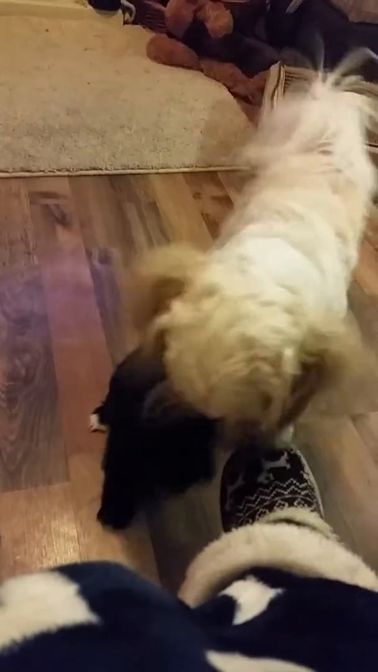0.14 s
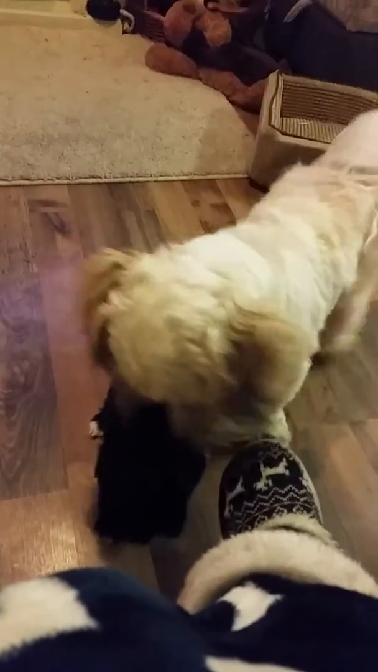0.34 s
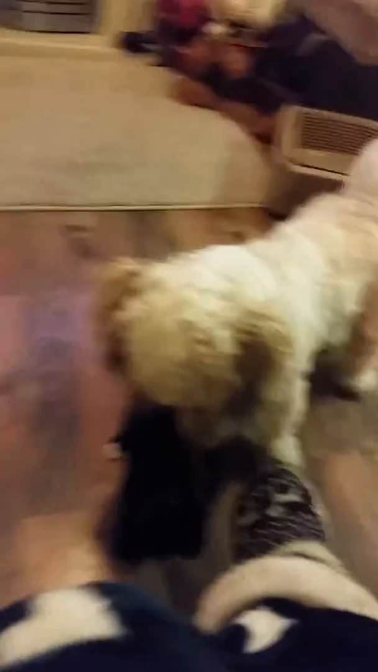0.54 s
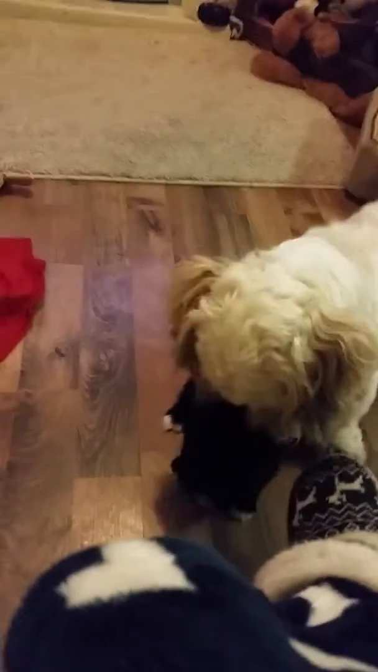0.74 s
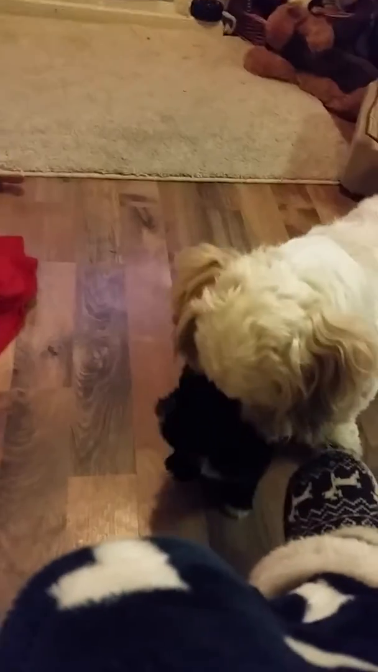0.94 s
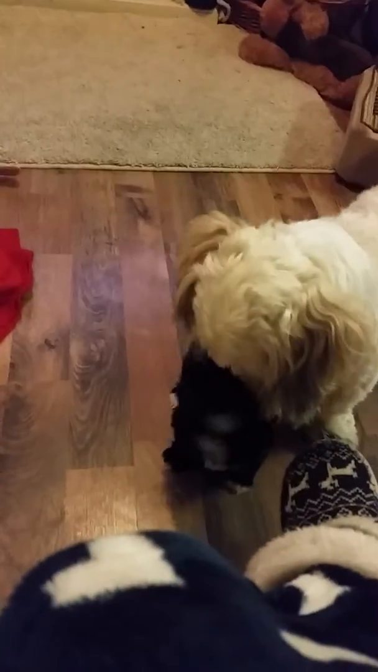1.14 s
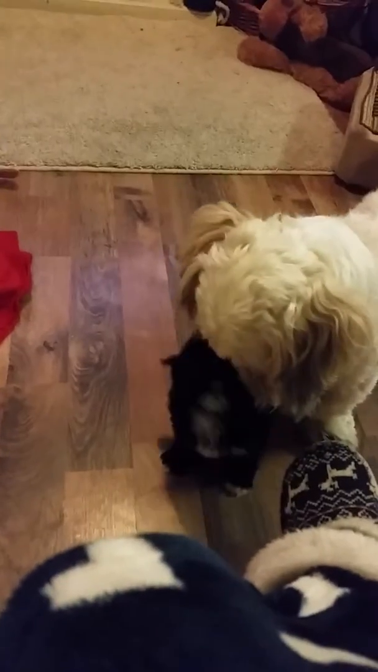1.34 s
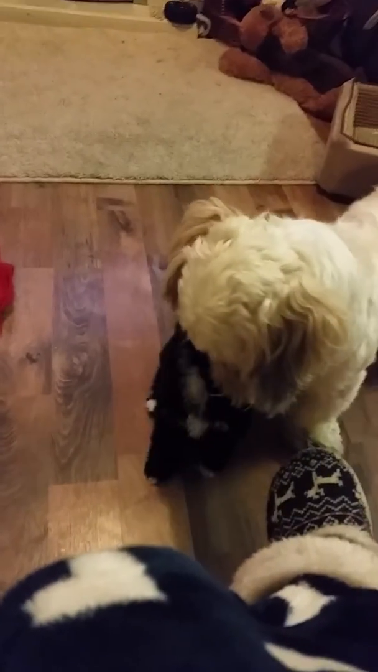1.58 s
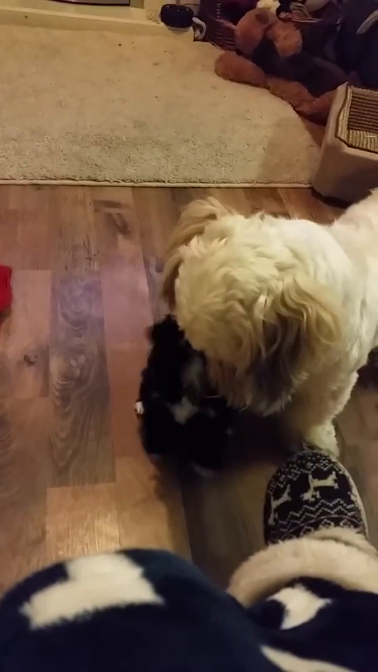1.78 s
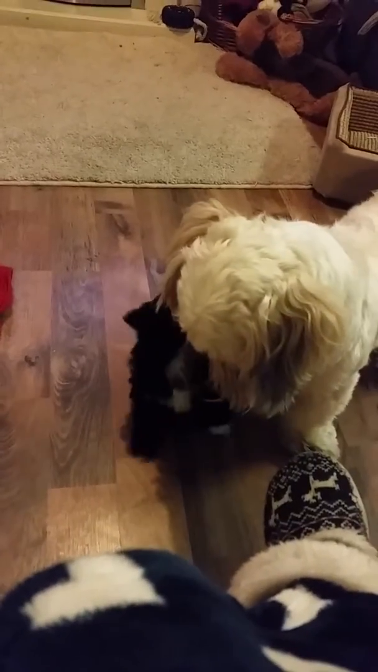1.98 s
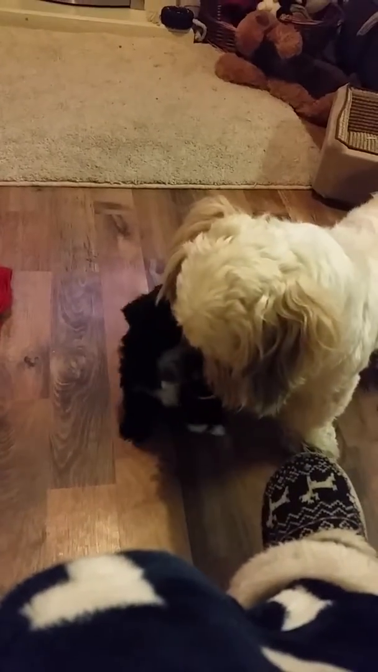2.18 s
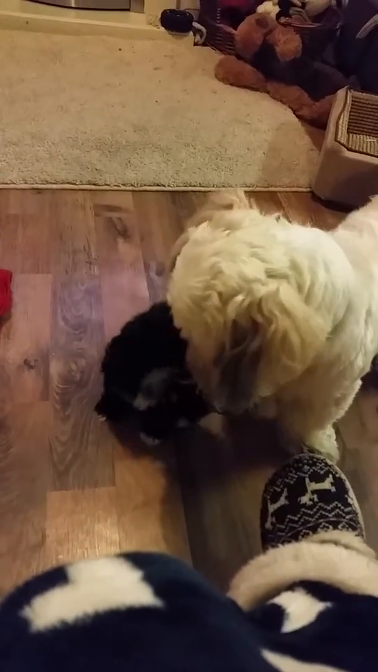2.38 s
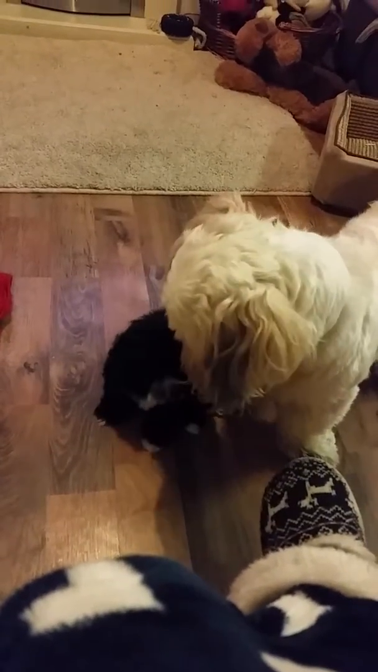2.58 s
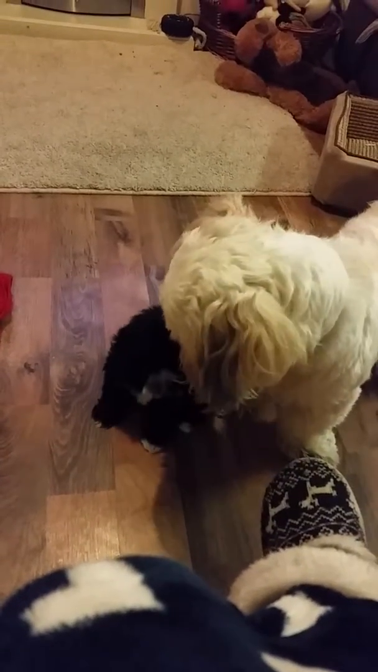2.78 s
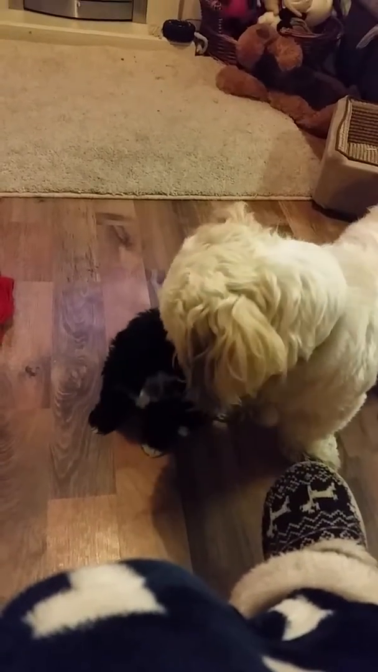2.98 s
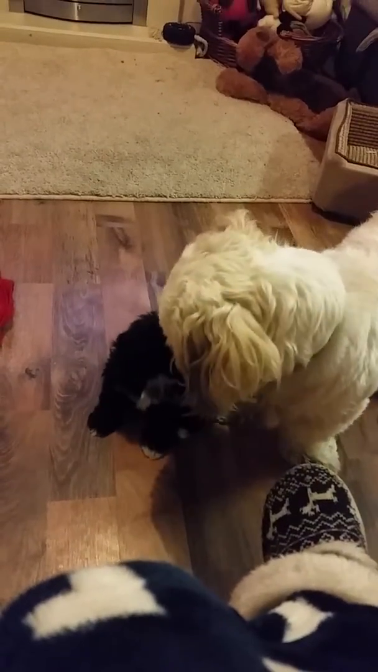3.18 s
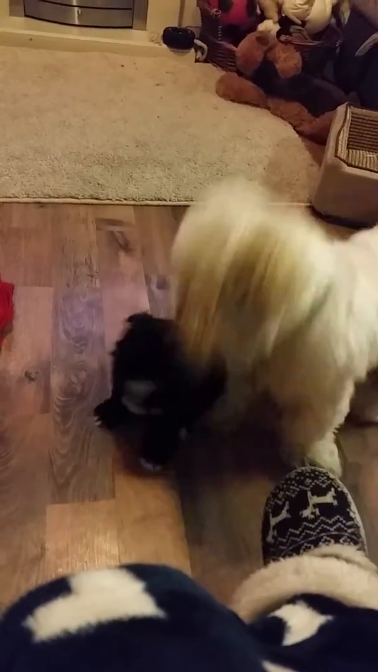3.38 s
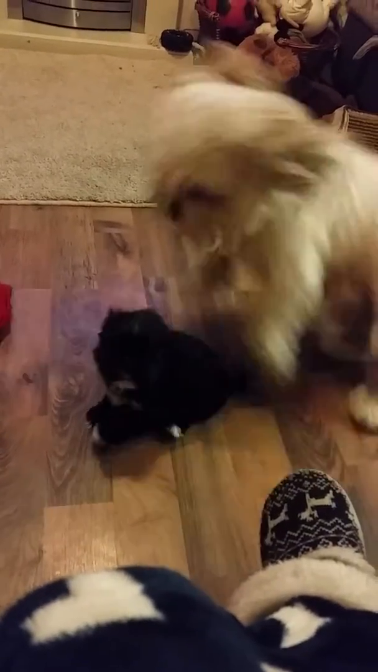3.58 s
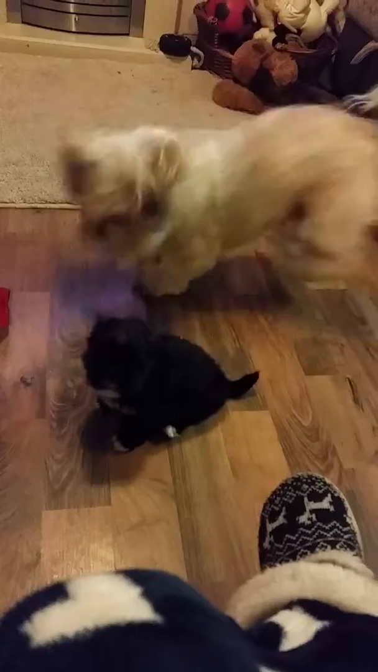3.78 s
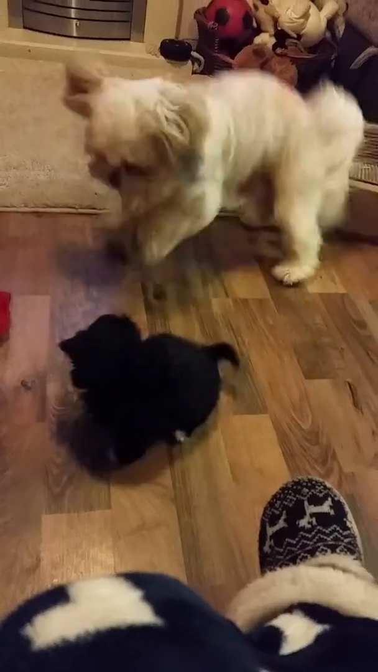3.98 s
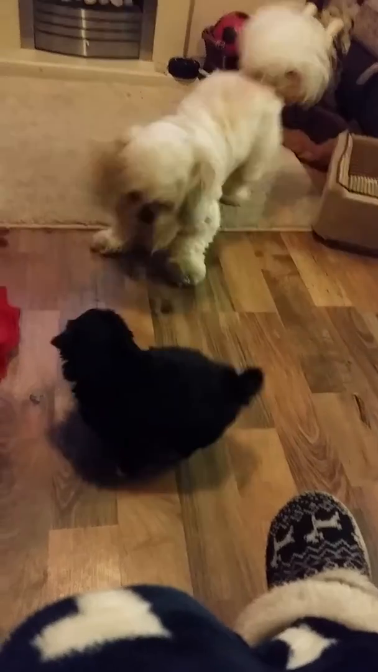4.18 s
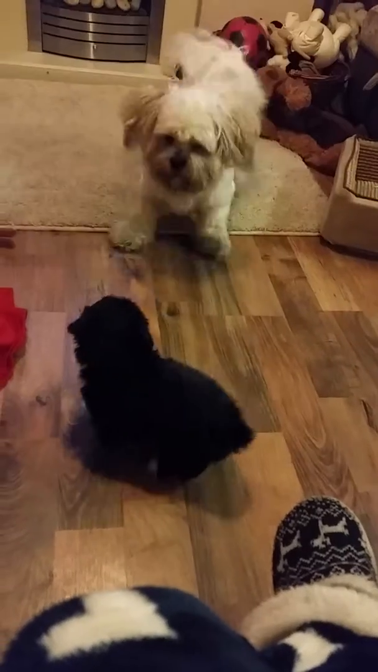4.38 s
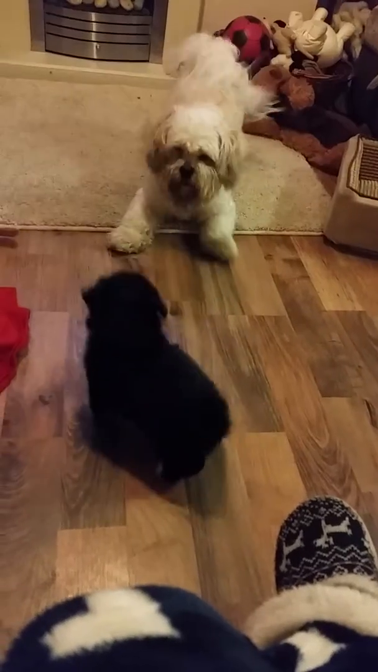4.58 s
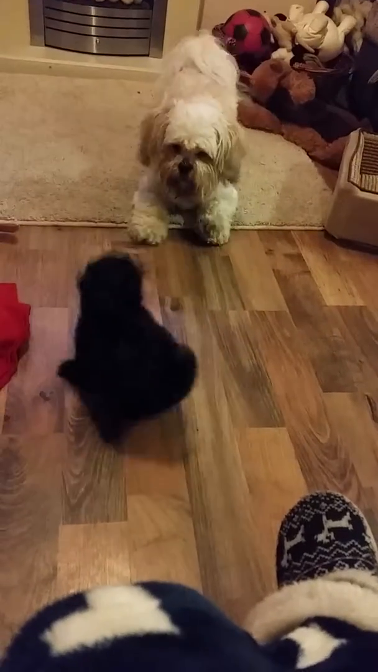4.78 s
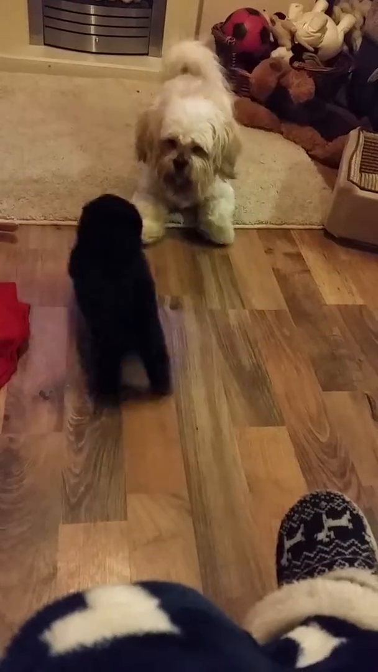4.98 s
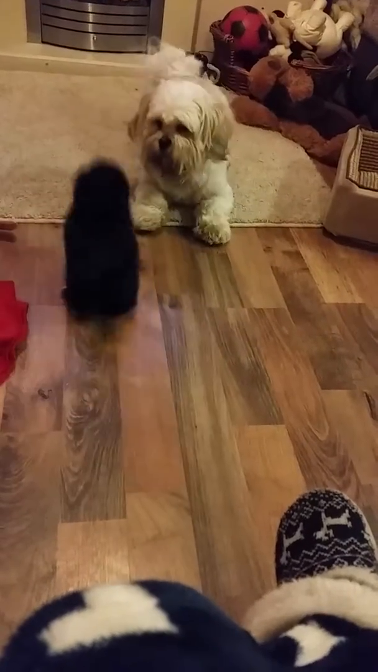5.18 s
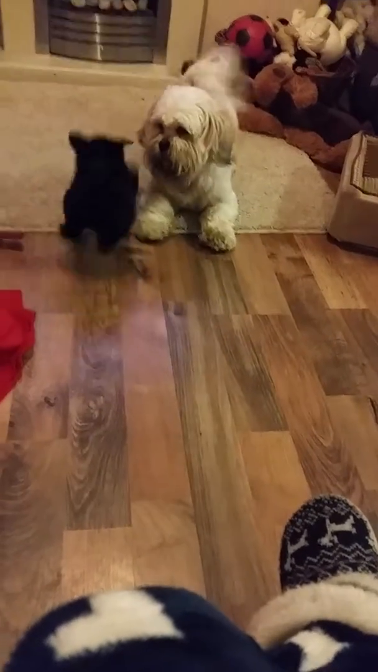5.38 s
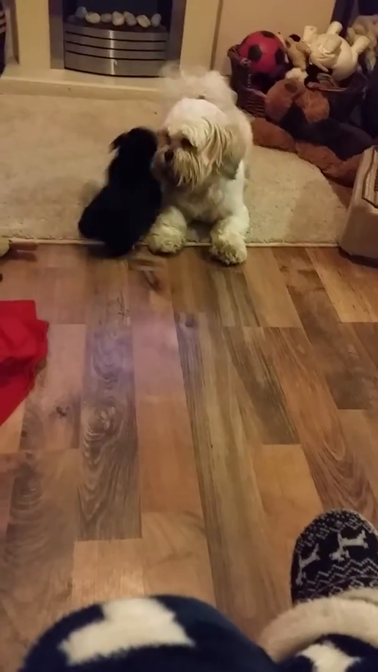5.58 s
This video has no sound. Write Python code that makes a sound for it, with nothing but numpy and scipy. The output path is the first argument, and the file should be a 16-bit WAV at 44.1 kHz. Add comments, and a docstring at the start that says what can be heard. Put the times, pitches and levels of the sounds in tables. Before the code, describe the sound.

In a living room, a small dog and a puppy play on laminate. Short scuffs and claw ticks open, then quiet hum with dull bumps on the handheld phone. Near four seconds comes a sharp scrabble of claws and paw slaps with short echoes, fading to faint pats and a final handling bump.

```python
"""A low appliance hum, house rumble and faint microphone hiss lie under a small dog and a puppy at play.
Paws scuff on laminate from the start as shaped friction noise, and pads land as soft slaps and thuds.
Claws tick in quick clusters: grating clicks excite ringing nails and knock the boards.
The living room answers every paw contact with echoes, and each clawed paw stirs the floor rumble.
Between the flurries of paws and again near the end, fingers bump the hand-held phone beside its right
port, as dull swings of pressure."""
import sys
import numpy as np
from scipy import signal
from scipy.fft import rfft, irfft
from scipy.io import wavfile
from scipy.ndimage import uniform_filter1d

SR = 44100
rng = np.random.default_rng(int(sys.argv[2]) if len(sys.argv) > 2 else 0)


def wav_record(signal):
    """Record a signal, one row per channel, as 16-bit PCM in the file named by sys.argv[1]."""
    frames = np.transpose(np.atleast_2d(signal))
    bounded = np.clip(frames, -1, 1)
    # unit amplitude maps onto the largest positive 16-bit level
    quanta = np.round(bounded * 32767).astype(np.int16)
    wavfile.write(sys.argv[1], SR, quanta)


N = 248724

# Every *_SPECTRUM table below has the columns freq_hz [Hz], level_db [dB, relative density].
# Every pan_db is left minus right [dB].

# appliance hum: freq_hz [Hz], level_db [dB rms], waver [share of the steady tone]
HUM_TONES = [(53.9, -54.5, .07), (102.3, -67, .45), (215.3, -72, .6)]
# low noise of house and floor: freq_hz [Hz], level_db [dB]
RUMBLE_SPECTRUM = [(20, -28), (38, -16), (55, -6), (78, -6.5), (105, 0.5), (160, -6.5), (215, -6),
                   (390, -14), (520, -23), (600, -17.5), (760, -30.5), (1100, -37), (3000, -58.5),
                   (9000, -93.5)]
# faint microphone hiss: freq_hz [Hz], level_db [dB]
AIR_SPECTRUM = [(1500, -3.5), (2150, 7), (3050, -2.5), (3650, 3), (4400, -3), (5900, -8.5), (7000, -3),
                (9800, -11), (11400, -6.5), (12300, 1.5), (13200, 0), (14400, -2.5)]
# rumble power each clawed paw adds: level for a 0 dB tick [dB], slope [dB per dB of tick],
# decay constant of the amplitude [s]
SHAKE_DB, SHAKE_SLOPE, SHAKE_FALL_S = -52.5, .3, .35

# scuffs and slides of paws and fur; the row at .59 is lingering room reverberation after the claw hits:
# start_s [s], rise_s [s], fall_s [s, decay constant],
# hiss_db [dB, before flicker], rub_db [dB relative to hiss], pan_db [dB]
FRICTION_SWELLS = [(0.0, 0.001, 0.098, -52, -1.5, -2), (.088, 0.0071, 0.016, -36.5, -8, -3),
                   (0.205, 0.015, 0.029, -47.5, -7.5, 0.5), (0.338, 0.0024, 0.026, -49, -2.5, 9),
                   (0.344, 0.021, 0.028, -38.5, -28, -5.5), (0.475, 0.0046, 0.02, -49.5, -6, 2.5),
                   (.59, 0.056, 0.18, -74.5, 0.5, -1.5), (1.98, 0.022, 0.12, -82, -6.5, -4),
                   (3.435, 0.0056, 0.081, -53.5, -5.5, -2.5), (3.51, 0.11, 0.072, -53, 0.5, -2),
                   (3.61, 0.12, 0.017, -45, -10, -1), (3.851, 0.01, 0.0078, -31.5, -11, -8),
                   (4.448, 0.0013, 0.11, -48, -6, -1), (4.66, .03, 0.14, -85.5, 13, -4),
                   (4.864, 0.013, 0.029, -62, -3, -4), (4.964, 0.032, 0.12, -76, 7.5, -1.5),
                   (5.127, .015, 0.048, -73, -1, -1.5), (5.24, 0.042, 0.068, -81, 4, -3),
                   (5.358, .012, 0.056, -78.5, -1.5, -1)]
# fine hiss over the wood grain: freq_hz [Hz], level_db [dB]
HISS_SPECTRUM = [(1200, -18), (2200, -9), (4200, -6), (6000, -4), (7100, 2), (8000, -2.5), (8900, -0.5),
                 (10500, -12.5), (12300, -6), (14500, -15.5)]
# boards rubbing along: freq_hz [Hz], level_db [dB]
RUB_SPECTRUM = [(150, -11.5), (350, -7.5), (700, 1), (1100, -5.5), (2000, -8), (3500, -20)]

# paw pads landing: start_s [s], level_db [dB, before the slap and thud trims],
# thud_db [dB relative to level_db, before the thud trim], pan_db [dB], contact_s [s]
PAD_LANDINGS = [(0.0568, -50.5, 6, 0, 0.002), (0.0734, -56.5, 5.5, -1, 0.0041),
                (2.3537, -42.5, -13.5, -1, 0.00046), (3.8464, -41, -13, 7, 0.00057),
                (3.9757, -33, -2.5, 3, 0.0014), (3.9861, -36.5, -10, -5.5, 0.0007),
                (4.1789, -38.5, -7.5, 1, 0.00053), (4.205, -50.5, 6.5, -0.5, 0.0019),
                (4.783, -55.5, -13.5, -6, 0.00069), (5.128, -51.5, -0.5, -3, 0.0004),
                (5.2466, -59, 8, -3.5, 0.0013), (5.2697, -46, -1.5, -3.5, 0.0012),
                (5.5595, -59, 9, -19, 0.0012), (5.5755, -54, -7, 5.5, 0.00069)]
# soft slap on the laminate: freq_hz [Hz], level_db [dB]
SLAP_SPECTRUM = [(150, -7), (400, -4), (750, 3), (1100, -3.5), (1500, -13), (2100, -15), (2800, -34),
                 (6000, -58.5)]
# floating floor under a pad: freq_hz [Hz], level_db [dB]
THUD_SPECTRUM = [(50, -16.5), (120, -3), (260, -0.5), (450, -5), (800, -11.5), (2000, -45), (8000, -85.5)]

# paws striking claws first: start_s [s], claw_count [claws], gap_s [s between claws],
# tick_db [dB, first claw before scatter], knock_db [dB relative to tick],
# board_hz [Hz, before detune], pan_db [dB], room_db [dB, extra room send]
CLAWED_PAWS = [(0.0834, 2, .0013, -26, -11, 763, -2.5, 0), (0.0881, 2, .0013, -26.5, -9.5, 769, -4, -0.5),
               (0.3384, 3, .0051, -35.5, -6.5, 770, -6, 2.5), (0.4759, 1, .002, -33, -21, 990, 7, 1.5),
               (0.4882, 2, 0.0019, -34.5, -20.5, 940, 9, -0.5), (3.4338, 2, 0.015, -45, -13, 660, 4, 6),
               (3.7306, 2, .0021, -32, -19, 810, 23, -1.5), (3.8297, 2, 0.0027, -27.5, -17, 850, -4, 0.5),
               (3.8453, 2, .001, -18.5, -20, 840, -1.5, -0.5), (3.8539, 1, .002, -25, -18.5, 930, -1, 2.5),
               (3.9149, 3, .0011, -17, -22, 1120, 4.5, -1), (3.9211, 1, .002, -22, -17, 1010, 1, 1.5),
               (3.9753, 3, .001, -17.5, -15.5, 842, 1.5, 0),
               (3.984, 3, 0.0036, -26.5, -10.5, 970, -13, -0.5),
               (4.1625, 3, 0.0029, -26.5, -19.5, 850, -3.5, 6),
               (4.1786, 4, 0.002, -18.5, -17, 996, 0.5, -0.5),
               (4.4466, 2, 0.0011, -28, -21.5, 750, -3.5, -3.5),
               (4.5065, 2, .002, -39.5, -17, 864, 2.5, 3.5), (4.7635, 1, 0.0024, -49, -10, 800, -10, -2.5),
               (5.1368, 1, 0.0018, -53, 0.5, 703, -8, -3)]
# grating tick of a claw: freq_hz [Hz], level_db [dB]
TICK_SPECTRUM = [(600, -31), (1800, -13.5), (3000, -14.5), (5500, -7.5), (7200, -5), (8800, -6),
                 (10300, -12.5), (12300, -10.5), (14500, -14.5)]
# knocked board: freq_hz [Hz], level_db [dB]
KNOCK_SPECTRUM = [(120, -19), (380, -8.5), (570, 0), (850, -5.5), (1150, -2), (1600, -6.5), (3000, -33)]
# ring of a claw: freq_hz [Hz, before detune], t60_s [s], level_db [dB relative to the click]
CLAW_RING = [(7260, .004, -15.5), (8550, 0.0043, -21), (12300, 0.006, -27)]
# ring of a board: pitch_ratio [times board_hz], t60_s [s], level_db [dB relative to the click]
BOARD_RING = [(.72, .014, -32), (1, 0.013, -17.5), (1.3, 0.017, -29)]
# claw after claw: mean fade [dB], timing jitter [share of gap_s], level scatter [dB]
CLAW_FADE_DB, CLAW_JITTER_SHARE, CLAW_SCATTER_DB = 2, 0.11, 2.5

# early echoes off furniture and walls: freq_hz [Hz], level_db [dB]
WALL_SPECTRUM = [(80, -6), (300, 0), (1000, -2.5), (2000, 2.5), (4200, 7.5), (7000, -1.5), (9000, 1.5),
                 (14000, 2)]
# faint late tail: freq_hz [Hz], level_db [dB]
LATE_SPECTRUM = [(80, -4), (500, -3), (2000, 10), (6000, -2.5), (14000, -12.5)]

# fingers on the phone case: start_s [s], level_db [dB]
FINGER_BUMPS = [(0.7932, -32.5), (1.0257, -46), (1.0737, -44.5), (1.258, -39.5), (1.4751, -45),
                (1.5133, -43.5), (1.546, -40.5), (1.5707, -42.5), (5.5117, -30), (5.5639, -42),
                (5.6056, -38.5), (5.6339, -35)]
# dull pressure of a bump: freq_hz [Hz], level_db [dB]
BUMP_SPECTRUM = [(30, -8.5), (80, 3), (150, 3.5), (300, -7), (500, -19), (1000, -45), (3000, -60),
                 (10000, -100)]
BUMP_PAN_DB = -30
# contact time of a 0 dB bump [s]; softer touches last longer by this power
BUMP_PUSH_S, BUMP_HARDENING = .00006, 0.62

TOP_HZ = 14550  # upper edge of the phone's passband


def undb(db):
    """Turn decibels into gain."""
    return 10 ** (np.asarray(db) / 20)


def unit(x):
    """Scale to rms 1."""
    return x / np.sqrt(np.mean(x ** 2))


def burst_unit(x, size):
    """Scale so that the loudest stretch of `size` samples has rms 1."""
    return x / np.sqrt(uniform_filter1d(x ** 2, size, mode="constant").max())


def gains(points, size):
    """Read a spectrum as gains at the bins of a transform, straight in dB over log frequency."""
    hz, db = np.transpose(points)
    bins_hz = np.fft.rfftfreq(size, 1 / SR)
    return undb(np.interp(np.log(bins_hz + 1), np.log(hz), db))


def colour(x, points):
    """Give a long sound a spectrum."""
    return irfft(rfft(x) * gains(points, x.shape[-1]), x.shape[-1])


def impulse(points, size=2048):
    """Make a minimum-phase response of unit energy: the spectrum's energy comes as early as it can."""
    cepstrum = irfft(np.log(gains(points, size)))
    cepstrum[1:size // 2] *= 2
    cepstrum[size // 2 + 1:] = 0
    h = irfft(np.exp(rfft(cepstrum)))
    return h / np.linalg.norm(h)


def ring(modes, detune, size=2048):
    """A click followed by damped modes, a little different at each blow."""
    t = np.arange(size) / SR
    response = (t == 0).astype(float)
    shifts = 1 + detune * rng.standard_normal(len(modes))
    for (hz, t60, db), shift in zip(modes, shifts):
        response += undb(db - 60 * t / t60) * np.cos(2 * np.pi * hz * shift * t)
    return response


def contact(fall_s, grit, size=2048):
    """Force of one contact: a sharp push and a quickly dying grate."""
    t = np.arange(size) / SR
    grate = rng.standard_normal(size) * np.exp(-t / fall_s)
    return (t == 0) + grit * grate


def through(x, h):
    """Pass x through the response h, keeping its length."""
    return signal.fftconvolve(x, h)[:len(x)]


def soften(x, push_s):
    """Spread a blow over a smooth push: the longer, the duller."""
    t = np.arange(512) / SR
    push = np.sin(np.pi * np.minimum(t / push_s, 1)) ** 2
    return through(x, push)


def stereo(pan_db):
    """Left and right gains of constant power."""
    g = undb(np.array([[pan_db], [-pan_db]]) / 2)
    return g / np.sqrt(np.mean(g ** 2))


def add(out, s, sound):
    """Mix a stereo sound in at time s."""
    i = max(int(s * SR), 0)
    out[:, i:i + sound.shape[1]] += sound[:, :N - i]


def walk(rate):
    """Slow smoothed random motion of rms 1, with `rate` fresh values a second."""
    k = int(SR / rate)
    steps = np.repeat(rng.standard_normal(N // k + 1), k)
    return unit(uniform_filter1d(uniform_filter1d(steps, k), k)[:N])


def appliance_hum():
    """Steady tones whose amplitude and phase waver slowly."""
    t = np.arange(N) / SR
    hum = np.zeros(N)
    for hz, db, waver in HUM_TONES:
        drift = 1 + waver * (walk(9) + 1j * walk(9))
        hum += undb(db) * unit(np.real(drift * np.exp(2j * np.pi * hz * t)))
    return hum


def floor_shake():
    """Power of the rumble in the boards: every clawed paw adds to it, and it dies away."""
    t = np.arange(N) / SR
    power = np.zeros(N)
    for s, _, _, tick_db, *_ in CLAWED_PAWS:
        decay = (t > s) * np.exp(-2 * np.abs(t - s) / SHAKE_FALL_S)
        power += undb(SHAKE_DB + SHAKE_SLOPE * tick_db) ** 2 * decay
    return power


def background(rumble_db=-62.0, air_db=-81.0, hum_pan_db=-3.5, rumble_pan_db=-4):
    """Appliance hum, paw-stirred rumble whose lows are nearly alike at both ports, and microphone hiss."""
    hum = appliance_hum()
    mid, side = (unit(colour(rng.standard_normal(N), RUMBLE_SPECTRUM)) for _ in range(2))
    side = colour(side, [(60, -7.5), (200, -8), (900, -0.5), (3000, -1.0)])
    swell = np.sqrt(undb(rumble_db) ** 2 + floor_shake())
    rumble = swell * np.array([mid + side, mid - side])
    air = unit(colour(rng.standard_normal((2, N)), AIR_SPECTRUM))
    return hum * stereo(hum_pan_db) + rumble * stereo(rumble_pan_db) + undb(air_db) * air


def grains(rate, spread_db):
    """Friction at the two ports: tiny slips of uneven size, partly shared."""
    slips = (rng.random((3, N)) < rate / SR) * rng.standard_normal((3, N))
    slips = slips * undb(spread_db * np.minimum(rng.exponential(size=(3, N)), 4))
    return unit(slips[:2] + 0.47 * slips[2])


def rasp(spectrum, rate, patchy_db, shift_db):
    """Grains whose colour shifts and whose level catches and lets go, as the paw crosses the wood."""
    sound = unit(colour(grains(rate, spread_db=1.5), spectrum))
    # the lows and a band near 4200 Hz lean against the rest
    bands = colour(sound, [(900, 0), (1800, -20), (3000, -20), (4200, 0), (6000, -20)])
    lean = shift_db * walk(25)
    shifted = bands * undb(lean) + (sound - bands) * undb(-lean / 2)
    return shifted * undb(patchy_db * walk(70))


def friction():
    """Claws and fur hiss over the grain of the rubbing boards; one swell is lingering reverberation."""
    t = np.arange(N) / SR
    hiss, rub = np.zeros((2, N)), np.zeros((2, N))
    for s, rise, fall, hiss_db, rub_db, pan_db in FRICTION_SWELLS:
        swell = np.clip((t - s) / rise, 0, 1) * np.exp(-np.maximum(t - s - rise, 0) / fall)
        hiss += undb(hiss_db) * stereo(pan_db) * swell
        rub += undb(hiss_db + rub_db) * stereo(pan_db) * swell
    hiss_sound = hiss * rasp(HISS_SPECTRUM, rate=9300, patchy_db=1.1, shift_db=-4.0)
    rub_sound = rub * rasp(RUB_SPECTRUM, rate=1800, patchy_db=1.75, shift_db=3.5)
    return hiss_sound + rub_sound


def room(x, wet_db, t60=0.29, late_t60=0.83, late_db=-21, gap_s=0.0012, build_s=0.013):
    """Furniture and walls: echoes thicken over some milliseconds, die fast, and leave a faint, duller tail."""
    t = np.arange(SR) / SR
    arrival = np.clip((t - gap_s) / build_s, 0, 1)
    # early echoes are few and distinct, later ones blend
    density = np.minimum(.02 + (t / .1) ** 2, 1)
    echoes = rng.standard_normal((2, SR)) * (rng.random((2, SR)) < density) / np.sqrt(density)
    early = colour(echoes, WALL_SPECTRUM) * undb(-60 * t / t60)
    late = colour(rng.standard_normal((2, SR)), LATE_SPECTRUM) * undb(late_db - 60 * t / late_t60)
    mid, side = arrival * (early + late)
    # long waves reach both ports nearly alike
    side = colour(side, [(150, -10), (600, -1.5), (1800, 1)])
    source = x.mean(0)
    wet = np.array([through(source, h / np.linalg.norm(h)) for h in (mid + side, mid - side)])
    return undb(wet_db) * stereo(-1.7) * wet


def pads(slap_db=-1, thud_db=-2):
    """Soft pads slap the laminate, and the floating floor thuds below."""
    out = np.zeros((2, N))
    for s, db, low_db, pan_db, push_s in PAD_LANDINGS:
        slap = through(contact(fall_s=0.0015, grit=0.073), impulse(SLAP_SPECTRUM))
        slap = burst_unit(soften(slap, push_s), size=90)
        thud = through(contact(fall_s=0.0033, grit=0.15), impulse(THUD_SPECTRUM))
        thud = burst_unit(soften(thud, push_s), size=400)
        landing = undb(slap_db) * slap + undb(low_db + thud_db) * thud
        add(out, s, undb(db) * stereo(pan_db) * landing)
    return out


def claw_strikes():
    """A paw rolls onto the floor: its claws land in turn on one board, softer on average each time."""
    for s, count, gap_s, tick_db, knock_db, board_hz, pan_db, room_db in CLAWED_PAWS:
        for k in range(int(round(count))):
            late, loud = rng.standard_normal(2)
            # the first claw keeps the paw's own time
            delay = gap_s * (k + CLAW_JITTER_SHARE * late * (k > 0))
            claw_db = tick_db - CLAW_FADE_DB * k + CLAW_SCATTER_DB * loud
            yield s + delay, claw_db, knock_db, board_hz, pan_db, room_db


def claws():
    """Each claw grates, rings and knocks its board; returns the direct sound and what the room hears."""
    direct, spread = np.zeros((2, N)), np.zeros((2, N))
    tick_body, board_body = impulse(TICK_SPECTRUM), impulse(KNOCK_SPECTRUM)
    for s, db, knock_db, board_hz, pan_db, room_db in claw_strikes():
        grate = contact(fall_s=.0004, grit=.8)
        nail = through(through(grate, tick_body), ring(CLAW_RING, detune=0.017))
        # the case scatters the treble differently into each port
        ports = [through(nail, contact(fall_s=.0003, grit=.25)) for _ in range(2)]
        tick = np.array([burst_unit(port, size=22) for port in ports])
        modes = [(ratio * board_hz, t60, mode_db) for ratio, t60, mode_db in BOARD_RING]
        knock = burst_unit(through(board_body, ring(modes, detune=0.05)), size=90)
        sound = undb(db) * (tick + undb(knock_db) * knock)
        add(spread, s, undb(room_db) * sound)
        # the right port lies a little further away: one sample later
        sound[1] = np.roll(sound[1], 1)
        add(direct, s, stereo(pan_db) * sound)
    return direct, spread


def roaming_room(x, wet_db, count=4):
    """As the dogs move, their contacts take turns among several echo patterns, 0.07 s at a time."""
    place = (np.arange(N) / SR // .07) % count
    out = np.zeros((2, N))
    for k in range(count):
        presence = uniform_filter1d(1. * (place == k), size=200)
        out += room(x * presence, wet_db)
    return out


def fingers():
    """A finger shifts on the case: one dull swing of pressure, mostly at the right port."""
    out = np.zeros((2, N))
    for s, db in FINGER_BUMPS:
        push_s = BUMP_PUSH_S * undb(-BUMP_HARDENING * db)
        # a faint low ring: Hz, t60 s, dB
        low_ring = ring([(136.0, 0.065, -51.0)], detune=0.095)
        swing = soften(through(impulse(BUMP_SPECTRUM), low_ring), push_s)
        add(out, s, undb(db) * stereo(BUMP_PAN_DB) * burst_unit(swing, size=220))
    return out


def scene():
    """Background, floor sounds with their room, and handling."""
    bed, slides, steps = background(), friction(), pads()
    ticks, ticks_spread = claws()
    echo = room(slides, wet_db=-5) + room(steps, wet_db=2.5) + roaming_room(ticks_spread, wet_db=3.0)
    return bed + slides + steps + ticks + echo + fingers()


def record(dry):
    """The phone cuts the top with a steep elliptic low-pass."""
    top_cut = signal.ellip(8, .2, 70, TOP_HZ, fs=SR, output="sos")
    return signal.sosfilt(top_cut, dry)


dry = scene()
out = record(dry)
wav_record(out)
```